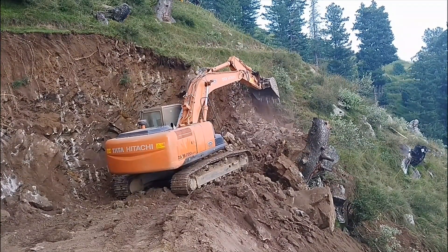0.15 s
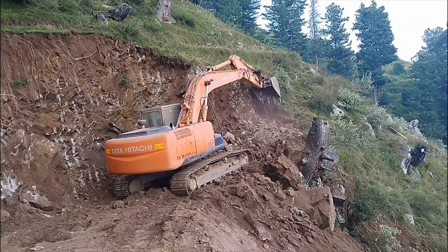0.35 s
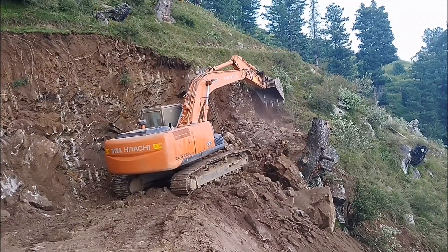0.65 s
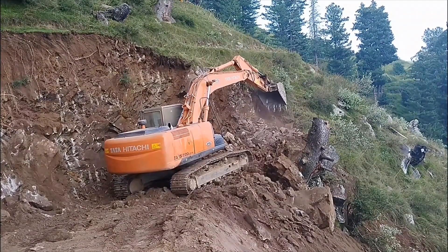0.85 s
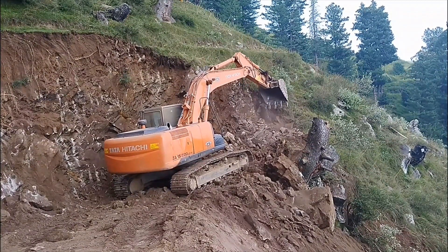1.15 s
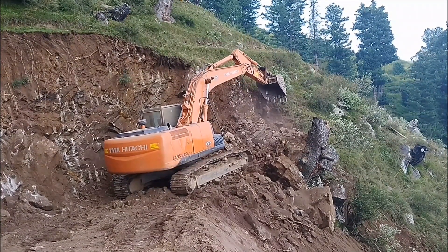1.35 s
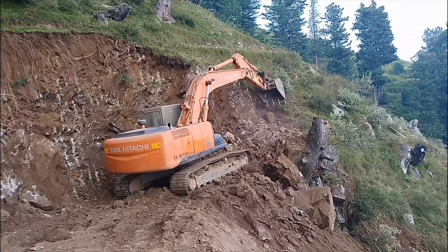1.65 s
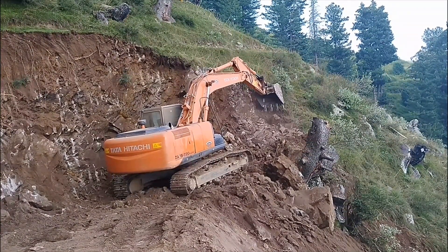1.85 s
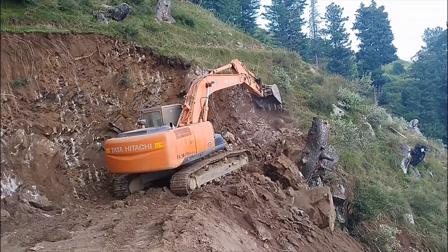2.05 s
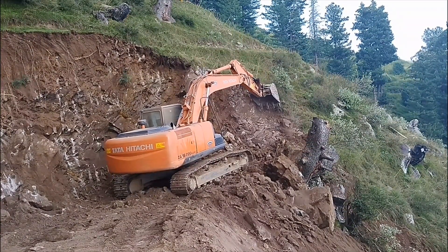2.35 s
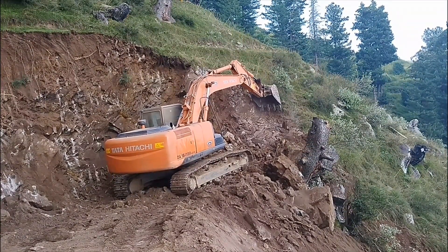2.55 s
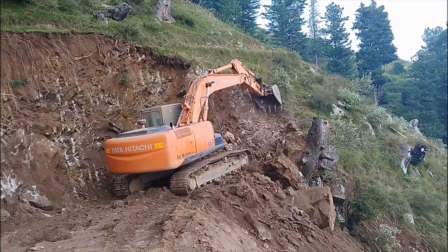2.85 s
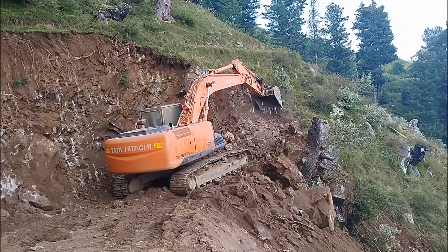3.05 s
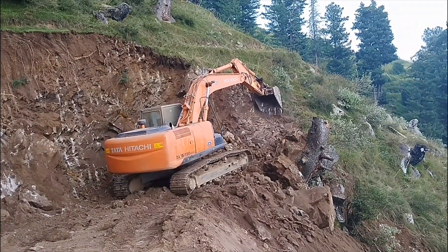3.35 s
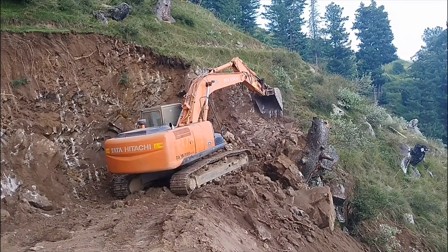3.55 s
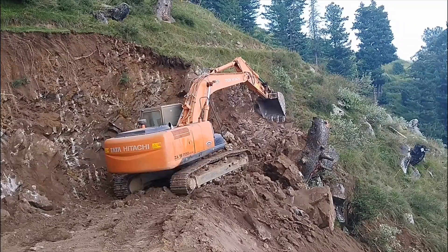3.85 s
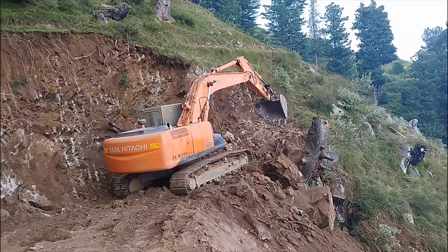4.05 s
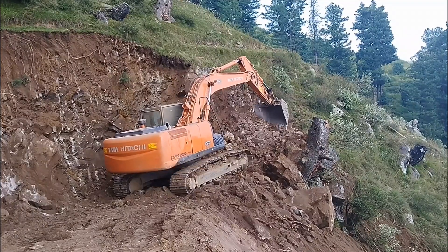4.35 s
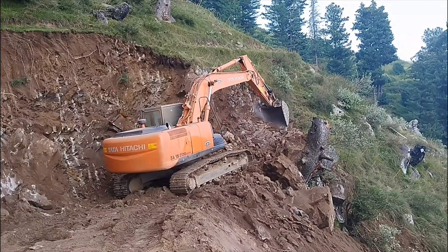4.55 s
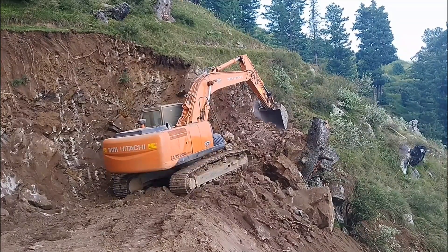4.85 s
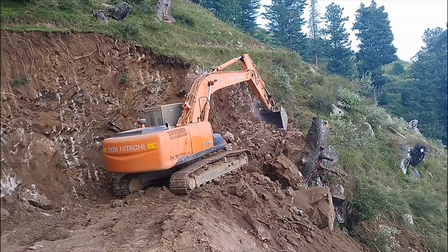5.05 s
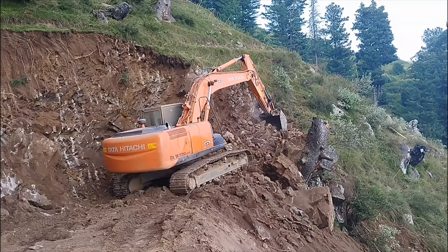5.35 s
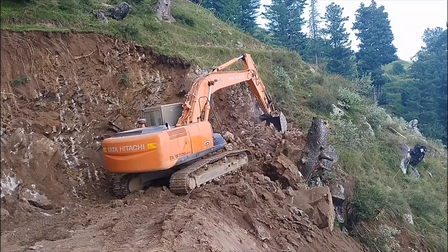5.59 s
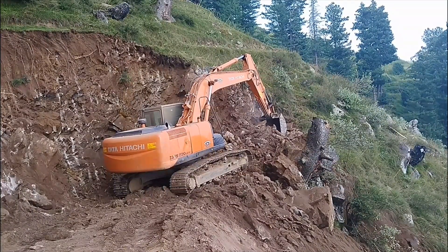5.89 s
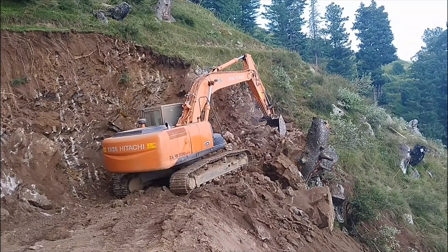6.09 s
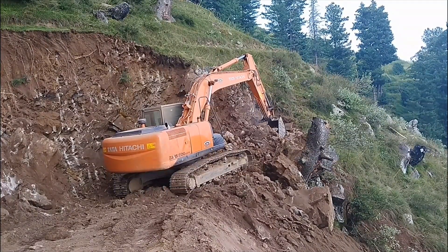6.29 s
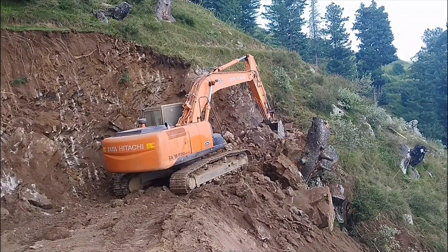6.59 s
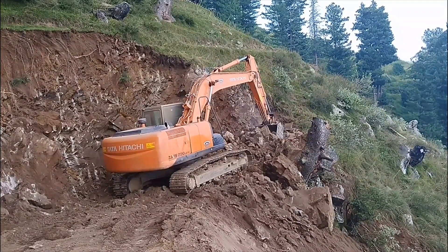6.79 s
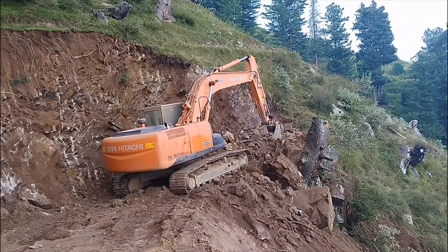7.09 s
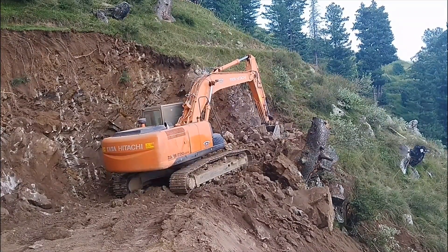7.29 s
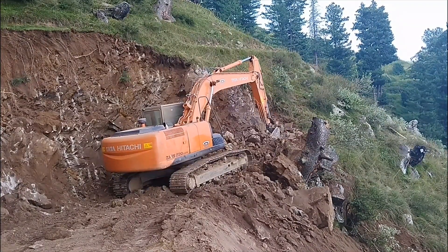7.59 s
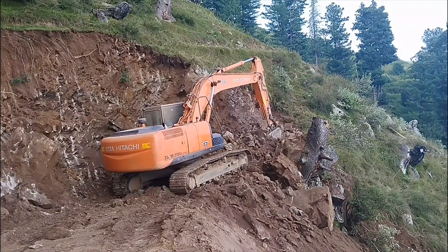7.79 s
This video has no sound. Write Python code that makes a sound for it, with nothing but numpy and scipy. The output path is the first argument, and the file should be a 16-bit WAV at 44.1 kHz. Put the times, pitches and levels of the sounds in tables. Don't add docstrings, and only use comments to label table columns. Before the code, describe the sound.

A diesel excavator works outdoors on a rocky hillside, its engine steady throughout: a low firing hum near 80 Hz, hollow exhaust boom, hydraulic pump whine and breathy fan roar, slightly left. Light wind rumbles and fine soil trickles continuously. From 0 to 0.6 s short bites scrape and knock, with two small stone snaps. Around 0.9-1.3 s the bucket drags into stones with clanks, and the engine sags slightly. A lull follows, with a small scrape near 1.9 s. From 2.4 to 4.7 s digging is heavy: crunching, grinding, snaps near 2.8 s, metallic ticks, and the loudest crack and knocks at 4.3-4.7 s. A drag and knock follow around 5-5.3 s. Then the engine dominates, pump whine firmer, with isolated rock taps near 6.1 and 6.3 s and soft spills, until a last short scrape at 7.8 s. Faint dull echoes follow blows.

```python
import sys
import numpy as np
from scipy import signal
from scipy.io import wavfile
from scipy.ndimage import uniform_filter1d

SR = 44100
rng = np.random.default_rng(int(sys.argv[2]) if len(sys.argv) > 2 else 0)


def gain_from_db(level_db):
    decades = np.asarray(level_db, float) / 20
    return 10 ** decades


def wav_record(signal):
    frames = np.transpose(np.atleast_2d(signal))
    bounded = np.clip(frames, -1, 1)
    quanta = np.round(bounded * 32767).astype(np.int16)
    wavfile.write(sys.argv[1], SR, quanta)


N = 349713
STEP = 40


def control_times_s():
    return np.arange(0, N + STEP, STEP) / SR


def rms_one(x):
    mono = np.mean(np.atleast_2d(x), axis=0)
    return x / np.sqrt(np.mean(mono ** 2) + 1e-20)


def in_time(rows):
    s, *columns = np.transpose(rows)
    return [np.interp(control_times_s(), s, c) for c in columns]


def fine(control):
    return np.interp(np.arange(N) / STEP, np.arange(len(control)), control)


def at_hz(points, hz):
    table_hz, value = np.transpose(points)
    return np.interp(np.log(hz), np.log(table_hz), value)


def drift(rate_hz):
    r = np.exp(-2 * np.pi * STEP * rate_hz / SR)
    count = len(control_times_s())
    slow = signal.lfilter([1], [1, -2 * r, r * r], rng.standard_normal(2 * count))
    return rms_one(slow[count:])


def resonance(x, hz, width_hz):
    r = np.exp(-np.pi * width_hz / SR)
    zeros = np.array([1, 0, -1]) * (1 - r * r) / 2
    poles = [1, -2 * r * np.cos(2 * np.pi * hz / SR), r * r]
    return signal.lfilter(zeros, poles, x + 1e-18)


def band(x, low_hz, high_hz):
    return signal.sosfilt(signal.butter(2, [low_hz, high_hz], "band", fs=SR, output="sos"), x)


def swells(start_s, length_s, level_db, rise_s, fall_db_per_s):
    t = control_times_s() - np.array(start_s)[:, None]
    late_s = np.maximum(t - np.array(length_s)[:, None], 0)
    fall = gain_from_db(np.array(level_db)[:, None] - fall_db_per_s * late_s)
    return (np.clip(t / rise_s, 0, 1) * fall) ** 2


def grains(per_s, spread_db):
    clicks = rng.random((4, N))
    born = clicks < per_s / SR
    luck = rng.random(4 * N)[:born.sum()]
    rarity = np.minimum(-np.log(1e-9 + np.abs(2 * luck - 1)), 5)
    clicks *= 0
    clicks[born] = gain_from_db(spread_db * rarity) * np.sign(luck - .5)
    return clicks.reshape(2, 2, N) / clicks.std()


# f/Hz, left-right/dB
LEAN = [(60, 11), (150, -2), (370, 0.5), (920, -6), (2290, -2), (5700, 4), (14200, -18)]


def spread(source, spectrum, likeness, level_db, patchy_db, patch_rate_hz):
    out, together = 0, drift(patch_rate_hz)
    edges_hz = 113 * 2 ** (np.arange(20.5) / 3)
    for k, (low, high) in enumerate(zip(edges_hz, edges_hz[1:])):
        hz = np.sqrt(low * high)
        if at_hz(spectrum, hz) < -34 - 20 * (hz > 1000):
            continue
        alike = np.clip(at_hz(likeness, hz), -.6, .999)
        flicker_db = patchy_db * (0.16 * together + drift(patch_rate_hz))
        gain = fine(gain_from_db(at_hz(spectrum, hz) + level_db(hz) + flicker_db))
        mid, side = gain * band(source[k % 2], low, high)
        side = np.sqrt((1 - alike) / (1 + alike)) * side * [[1], [-1]]
        lean = gain_from_db(at_hz(LEAN, hz) / 2 * np.array([[1], [-1]]))
        out = out + lean * (mid + side)
    return out


# t/s, level/dB
GUSTS = [(0.0, -39), (0.31, -37), (0.42, -34), (0.6, -41), (2.43, -45), (2.54, -38), (3.09, -43),
         (3.4, -39), (3.77, -42), (4.04, -29), (4.35, -47), (4.37, -39), (4.99, -38), (5.08, -45),
         (5.14, -31), (5.23, -43), (7.62, -43), (7.93, -41)]


def wind():
    air = band(rng.standard_normal((3, N)), 20, 80) * fine(gain_from_db(2.0 * drift(5)))
    return fine(gain_from_db(in_time(GUSTS)[0] + 0.5)) * rms_one(air[0] + 0.61 * air[1:])


# t/s, length/s, level/dB
SPILLS = [(0, 0.043, -42), (0.347, .2, -39), (0.84, 0.027, -45), (0.922, 0.025, -34.5), (1.048, 0.023, -45),
          (1.163, 0.17, -43), (1.736, 0.16, -45), (2.55, 0.054, -39), (2.68, 0.063, -51),
          (2.803, 0.051, -40), (3.184, 0.2, -42.5), (4.01, 0.17, -38), (4.29, .07, -42),
          (4.453, 0.037, -37), (4.567, .12, -36), (5.809, .08, -53), (6.25, .12, -44.5), (6.86, 0.025, -46),
          (6.95, 0.026, -55), (7.462, .08, -44)]
SPILL_RISE_S, SPILL_FALL_DB_PER_S, TRICKLE_DB = 0.0046, 97, -45


def pouring_db():
    spills = swells(*np.transpose(SPILLS), SPILL_RISE_S, SPILL_FALL_DB_PER_S)
    return 10 * np.log10(gain_from_db(TRICKLE_DB) ** 2 + spills.sum(axis=0))


def soil():
    patter = grains(per_s=9000, spread_db=2.1)[0]
    return fine(gain_from_db(pouring_db() - 2 + 2.1 * drift(26))) * rms_one(band(patter, 4330, 17700))


def tones(rate_hz, lines, wobble_db):
    phase = 2 * np.pi * np.cumsum(fine(rate_hz)) / SR
    out = 0
    for multiple, db in lines:
        level = np.sqrt(2) * fine(gain_from_db(db + wobble_db * drift(5.1)))
        out = out + level * np.sin(multiple * phase + 6 * rng.random())
    return out


def hollow(modes):
    out = 0
    for hz, width_hz, db in modes:
        gas = rng.standard_normal(N)
        for _ in range(2):
            gas = resonance(gas, hz, 1.68 * width_hz)
        out = out + gain_from_db(db) * rms_one(gas)
    return out


# t/s, f/Hz
FIRING_RATE = [(0, 81), (.75, 80.8), (1.05, 78.8), (1.35, 76.8), (1.65, 78.5), (1.95, 79.5), (2.4, 78.5),
               (3.1, 78.5), (3.4, 81.5), (3.7, 80.1), (4.3, 79), (4.9, 78.5), (5.2, 79.8), (5.9, 78),
               (6.5, 79.9), (7.1, 79.5), (7.5, 78.3), (7.93, 79.8)]
# multiple of firing rate, level/dB rms
FIRING_LINES = [(1, -29), (2, -37.5), (3, -40.5), (4, -50.5), (5, -69)]
# multiple of firing rate, level/dB rms
PUMP_LINES = [(14 / 3, -42.5)]
# t/s, level/dB
PUMP_LOAD = [
    (0, -4.5),
    (3.2, -3.5),
    (3.7, -1.5),
    (7.93, 0),
]
# f/Hz, width/Hz, level/dB rms
EXHAUST = [(135.2, 29.5, -32), (172.7, 18.9, -26), (238.1, 18.4, -36.5), (69, 19, -40.5)]
# f/Hz, width/Hz, level/dB rms
WHISTLES = [(2578, 21, -56.5), (3120, 45, -61), (7100, 260, -55.5), (795, 19, -53), (594, 120, -38.5)]
# f/Hz, level/dB per Hz
ROAR = [(160, -39), (270, -14.5), (340, -16), (370, 3), (401, -7.5), (489, -4), (740, -3.5), (858, -9),
        (1930, -14), (2390, -48.5), (2600, -22), (2820, -27), (7110, -38.5), (14000, -53)]
# f/Hz, left-right likeness
ROAR_LIKENESS = [(60, 0.99), (180, -2), (530, 1.5), (1590, 0.2), (4750, -0.6), (14200, -3.5)]
ROAR_DB = -33.5


def engine():
    rate_hz = in_time(FIRING_RATE)[0]
    firing = tones(rate_hz, FIRING_LINES, wobble_db=1.1)
    pump = tones(rate_hz, PUMP_LINES, wobble_db=2.2) * fine(gain_from_db(in_time(PUMP_LOAD)[0]))
    whistle = hollow(WHISTLES) * fine(gain_from_db(1.3 * drift(6)))
    noise = rng.standard_normal((2, 2, N))
    roar = spread(noise, ROAR, ROAR_LIKENESS, lambda hz: 0, patchy_db=2.0, patch_rate_hz=7.1)
    tonal = (firing + pump + hollow(EXHAUST)) * gain_from_db([[-.2], [.2]])
    return tonal + whistle * gain_from_db([[1.5], [-1.5]]) + gain_from_db(ROAR_DB) * rms_one(roar)


def hillside(x):
    out, dull = np.zeros((2, N)), band(x.mean(axis=0), 250, 2700)
    lags = (rng.uniform(0.0089, .12, 10) * SR).astype(int)
    for k, lag in enumerate(lags):
        out[k % 2, lag:] += dull[:-lag] * gain_from_db(-60 * lag / SR / .5)
    return out


# f/Hz, width/Hz, depth 0-1
GROUND_DIPS = [(405, 90, .6), (900, 140, .6), (2780, 200, .45)]


def ground_dips(x):
    for hz, width_hz, depth in GROUND_DIPS:
        x = x - depth * resonance(x, hz, width_hz)
    return x


# t/s, peak level/dB, ring f/Hz
TICKS = [(1.767, -28.5, 1800), (2.805, -22, 560), (3.112, -15, 500), (3.225, -29, 1830), (3.26, -24, 1840),
         (3.349, -21.5, 1830), (3.979, -28, 3300), (4.059, -18, 1272), (4.155, -31, 3550),
         (4.525, -23, 2600), (4.667, -18.5, 1265), (4.785, -34, 2600), (6.062, -36, 5050), (6.3, -40, 3900),
         (7.845, -27, 1250), (7.863, -25.5, 1615)]


def ticks():
    out, t = np.zeros(N), np.arange(SR // 20) / SR
    for s, peak_db, hz in TICKS:
        envelope = (1 - np.exp(-t / 0.0017)) * np.exp(-t / (0.0096 + 12 / hz))
        out[int(s * SR):][:len(t)] += gain_from_db(peak_db) * envelope * np.sin(2 * np.pi * hz * t)
    return out


# t/s, peak level/dB, pulse half-length/ms, push +1 or suction -1
SNAPS = [
    (0.135, -12, 1.8, 1),
    (0.525, -16, 2.0, -1),
    (2.76, -9, 1.8, 1),
    (2.814, -8, 2.2, 1),
    (2.8955, -5, 1.8, -1),
    (3.1715, -11, 1.8, 1),
    (1.068, -10, 1.4, 1),
    (1.0715, -10, 1.4, 1),
    (4.308, -1, 1.4, -1),
]


def snaps():
    out = np.zeros(N)
    for s, peak_db, half_ms, sign in SNAPS:
        u = np.linspace(-3, 3, int(half_ms * SR / 500))
        pulse = (1 - 2 * u * u) * np.exp(-u * u)
        out[int(s * SR) - len(u) // 2:][:len(u)] += sign * gain_from_db(peak_db) * pulse
    return out


# t/s, peak level/dB, brightness/dB
KNOCKS = [(0.281, -10.5, -18), (0.328, -16, -28), (1.056, -10.5, -20), (1.159, -9, -13), (1.974, -25, -30),
          (2.528, -19, -32), (2.687, -10, -32), (2.758, -9.5, -22), (2.811, -14, -28), (3.115, -36, -34),
          (3.232, -9.5, -26), (3.292, -11, -29), (3.437, -19, -40), (3.846, -15, -29), (3.893, -11, -40),
          (4.016, -6.5, -13), (4.058, -11, -34), (4.147, -8.5, -29), (4.27, -6, -36), (4.305, -7, -22),
          (4.398, -15, -19), (4.476, -2, -14.5), (4.547, -6, -20), (4.578, -5.5, -24), (4.652, -5, -16.5),
          (5.118, -11.5, -32), (5.228, -17, -18), (6.299, -24, -15), (6.06, -17.5, -24), (7.73, -23, -25)]
# f/Hz, level/dB, t60/s
PLATES = [(540, -6, .15), (595, -9, .1), (665, -10, .08), (720, -10, .08), (770, -11, .07),
          (1050, -12, .07), (1175, -11, .08), (1290, -12, .07), (1780, -17, .08), (1845, -16, .1),
          (2130, -21, .06), (2580, -23, .06), (3550, -26, .05), (4700, -31, .04)]
KNOCK_LEFT_DB, KNOCK_SCATTER_DB = -3.5, 3.5


def knocks():
    s, peak_db, bright_db = np.transpose(KNOCKS)
    at = (s * SR).astype(int)
    luck = rng.normal(0, 1, (len(s), len(PLATES) + 1))
    rubble = rng.standard_normal((3, N))

    def burst(level_db, rise_s, fall_s, noise):
        blows = np.zeros(N)
        blows[at] = gain_from_db(level_db)
        rise, fall = np.exp(-1 / (np.array([rise_s, fall_s]) * SR))
        poles = np.convolve([1, -rise], [1, -fall])
        return noise * signal.lfilter([1 - rise], poles, blows + 1e-18)

    ringing = 0
    for (hz, db, t60), chance in zip(PLATES, luck.T):
        level_db = peak_db + db + 4 * chance + (hz > 2000) * (bright_db + 23)
        shake = burst(level_db, .003, .012, rubble[0])
        ringing = ringing + resonance(shake, hz, 2.2 / t60) * np.sqrt(t60)
    crack = band(band(burst(peak_db, 0.0022, 0.029, rubble[1]), 440, 1990), 510, 1740)
    chip = burst(peak_db + bright_db + 17, 0.0059, 0.0091, rubble[2])
    chip = band(band(chip, 3200, 3300), 2800, 7800)
    latest = np.clip(np.searchsorted(at, np.arange(N)) - 1, 0, None)
    side_db = KNOCK_LEFT_DB + KNOCK_SCATTER_DB * luck[:, -1]
    return (gain_from_db(27.5) * ringing + crack + chip) * gain_from_db(side_db * [[.5], [-.5]])[:, latest]


# t/s, length/s, grinding level/dB, thud re grinding/dB, hardness/dB
BITES = [(0.048, 0.12, -32, 7, -3.5), (0.269, 0.094, -22, -3, -1), (0.406, 0.15, -35, 10, -4),
         (0.933, 0.26, -26, 1, 1.5), (1.043, 0.066, -19.5, -9.5, -9), (1.151, 0.042, -20, -2.5, -1),
         (1.927, 0.11, -27.5, -3, -4.5), (2.442, 0.14, -24, -3.5, -2.5), (2.656, 0.12, -20.5, -1.5, 2.5),
         (2.754, 0.1, -13.5, -3, -3.5), (2.88, 0.11, -27.5, 5, -7), (3.097, 0.12, -20, -3.5, -4.5),
         (3.156, .3, -21, -3, -6.5), (3.604, 0.31, -33.5, -2, 3.5), (3.835, .15, -20.5, -10, -2.5),
         (3.984, .08, -14.5, -1.5, -1.5), (4.09, 0.17, -23, -7, 0), (4.272, 0.063, -16.5, -8, 0),
         (4.344, 0.14, -19, -1.5, -1.5), (4.448, 0.081, -15.5, -5.5, -2), (4.539, 0.072, -16.5, -4, 2.5),
         (4.634, 0.031, -14, -3.5, -7), (4.984, 0.3, -27, -4, -2), (7.802, 0.14, -25.5, -8, -2.5)]
# f/Hz, level/dB per Hz
BUCKET = [(65, -39), (110, 3), (171, -4), (288, -3), (400, -11.5), (524, -3.5), (727, 0), (881, -18.5),
          (1200, -7.5), (1830, -28), (2860, -36), (3460, -24.5), (4200, -43), (8400, -33.5), (11000, -58),
          (14300, -81), (22000, -120)]
# f/Hz, left-right likeness
BITE_LIKENESS = [(60, 0.98), (180, 0.96), (530, 1), (1590, 0.88), (4750, -0.36), (14200, 0.39)]
BITE_RISE_S, BITE_RISE_SHARE, BITE_FALL_DB_PER_S = 0.0056, 0.31, 208
SLUMP_DB, SLUMP_FALL_DB_PER_S = -12.5, 31
IDLE_DRAG_DB = -37.5
THUD_DB, DEEP_LOSS_DB = 6.5, 5.5
RASP_DB, RASP_FOLLOWS, GRIT_DB, GRIT_FOLLOWS = 3, 1, -0.5, 1.13


def grinding():
    s, length_s, level_db, thud_db, hard_db = np.transpose(BITES)
    rise_s = (BITE_RISE_S + BITE_RISE_SHARE * length_s)[:, None]
    power = swells(s, length_s, level_db, rise_s, BITE_FALL_DB_PER_S)
    power = power + swells(s, length_s, level_db + SLUMP_DB, rise_s, SLUMP_FALL_DB_PER_S)
    total = power.sum(axis=0) + gain_from_db(IDLE_DRAG_DB) ** 2
    grind_db = 10 * np.log10(total)
    thud_db, hard_db = thud_db @ power / total, hard_db @ power / total

    def colour_db(hz):
        thud, rasp, grit = hz < 420, 930 < hz < 2150, hz > 2150
        low = thud * (thud_db + THUD_DB - DEEP_LOSS_DB * (hz < 210.0))
        middle = rasp * (RASP_DB + RASP_FOLLOWS * hard_db)
        high = grit * (GRIT_DB + GRIT_FOLLOWS * hard_db)
        return grind_db + low + middle + high

    judder = fine(gain_from_db(1.56 * drift(22)))
    stones = grains(per_s=2200, spread_db=3.2) * judder
    crush = spread(stones, BUCKET, BITE_LIKENESS, colour_db, patchy_db=2.4, patch_rate_hz=20.0)
    ringing = 0
    for k, (hz, db, t60) in enumerate(PLATES):
        struck = stones[k % 2, 0] * fine(gain_from_db(db + colour_db(hz) + 1.7 * drift(8.4)))
        ringing = ringing + resonance(struck, hz, 2.8 / t60)
    return gain_from_db(15.0) * crush + gain_from_db(17.5) * ringing


def scene():
    digging = ground_dips(grinding() + knocks()) + snaps() + ticks()
    machine = engine() + digging + gain_from_db(-14.5) * hillside(digging)
    machine[1] = np.roll(machine[1], 2)
    return machine + soil() + wind()


# f/Hz, luck above which a band drops
HOLES = [(2500, 3), (4500, 2.0), (6000, 1.45), (9300, 1.05), (10000, .5), (10400, -1.2), (11300, -.7),
         (12300, -1.1), (13400, .1), (14000, -2.5)]


def starved(x, depth_db):
    hz, _, cells = signal.stft(x, SR, nperseg=1024)
    luck = rng.standard_normal((len(hz) // 4 + 1, cells.shape[2]))
    luck = uniform_filter1d(luck, size=4) * 2
    luck = np.repeat(luck, 4, axis=0)[:len(hz)]
    gone = 1 / (1 + np.exp(-6 * (luck - at_hz(HOLES, hz + 1)[:, None])))
    gain = gain_from_db(-depth_db * gone * (hz[:, None] > 2200))
    return signal.istft(cells * gain, SR, nperseg=1024)[1][:, :N]


def band_limit(x):
    return signal.sosfilt(signal.butter(12, 14770, fs=SR, output="sos"), x)


def record(dry):
    low_pass = signal.cheby2(10, 45, 10900, fs=SR, output="sos")
    body = signal.sosfilt(low_pass, 1.3 * np.tanh(dry / 1.3))
    air_db = -55 + 0.74 * np.maximum(pouring_db() + 47, 0)
    air = fine(gain_from_db(air_db)) * rms_one(band(rng.standard_normal(dry.shape), 9250, 13000))
    mix = starved(body + air, depth_db=53)
    return band_limit(mix)


dry = scene()
out = record(dry)
wav_record(out)
```